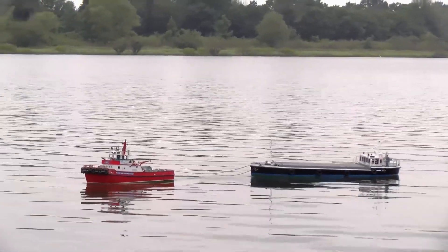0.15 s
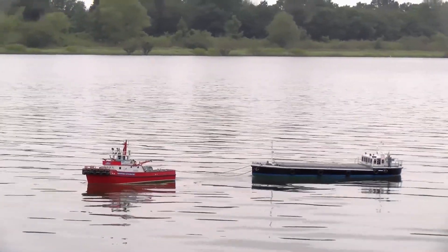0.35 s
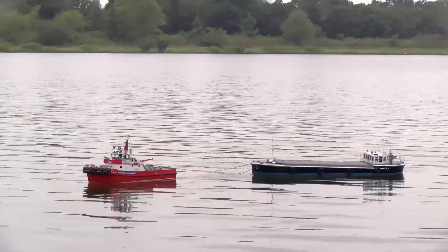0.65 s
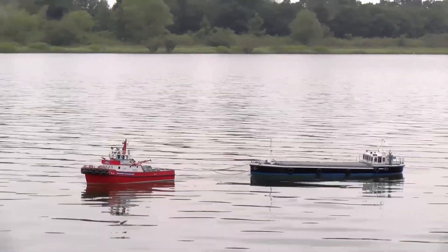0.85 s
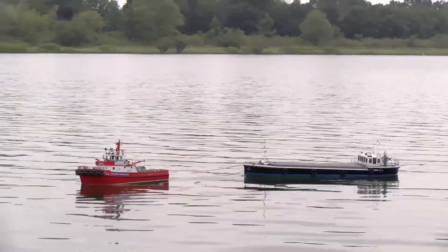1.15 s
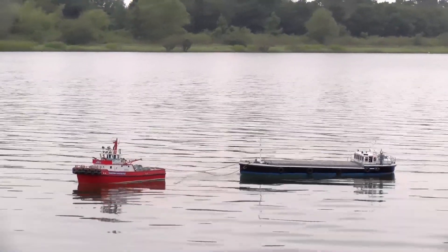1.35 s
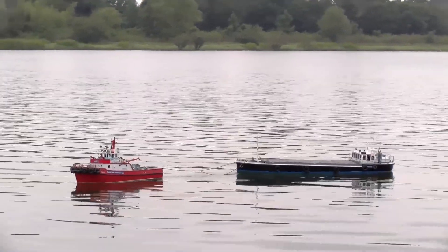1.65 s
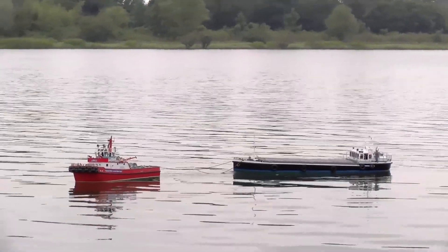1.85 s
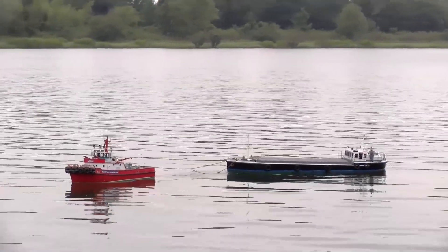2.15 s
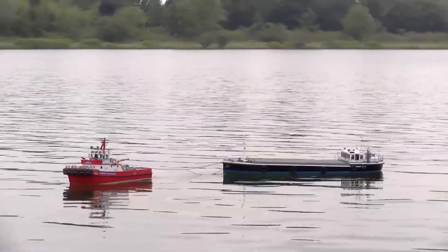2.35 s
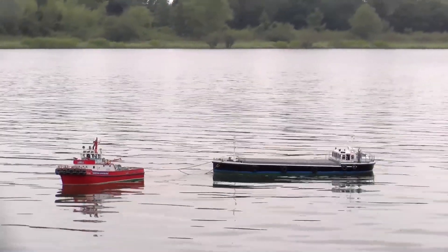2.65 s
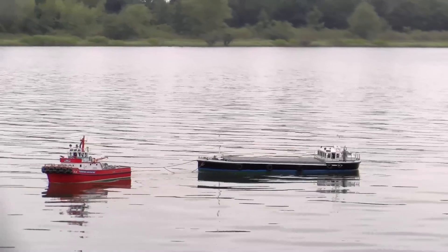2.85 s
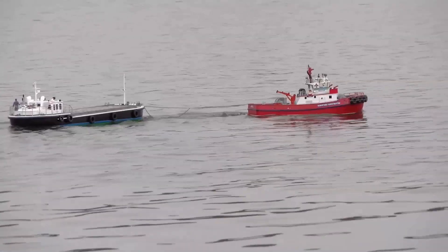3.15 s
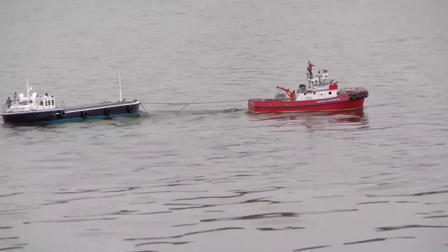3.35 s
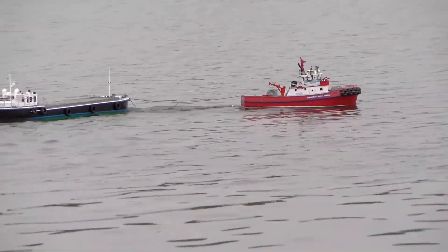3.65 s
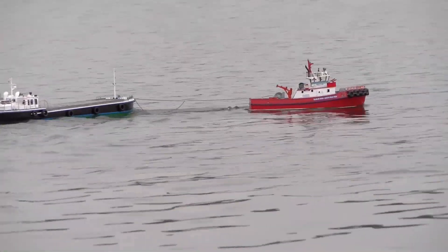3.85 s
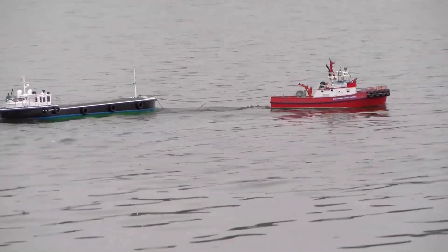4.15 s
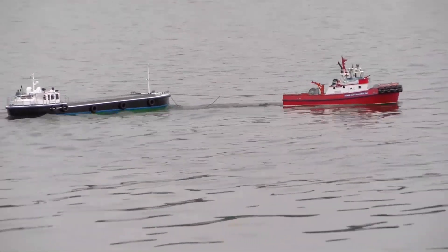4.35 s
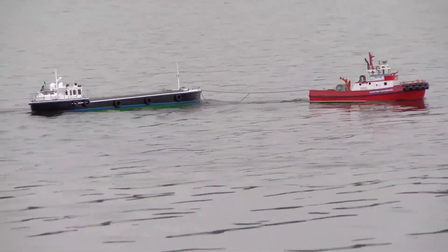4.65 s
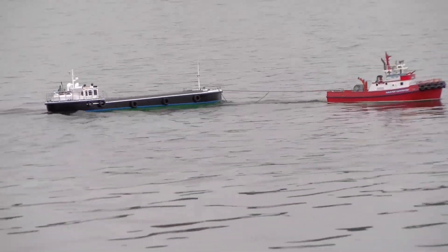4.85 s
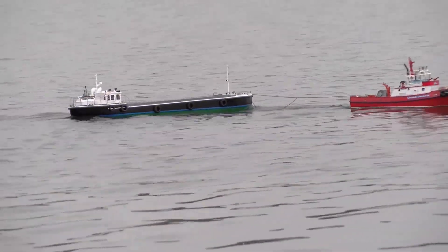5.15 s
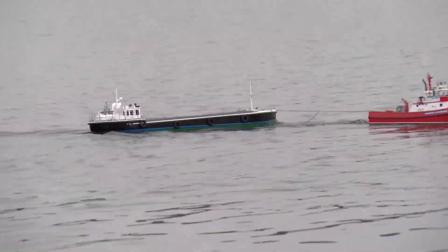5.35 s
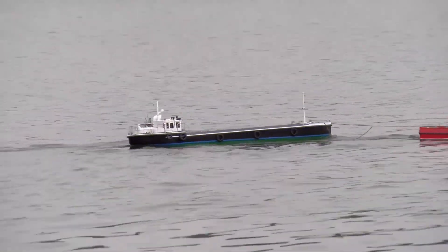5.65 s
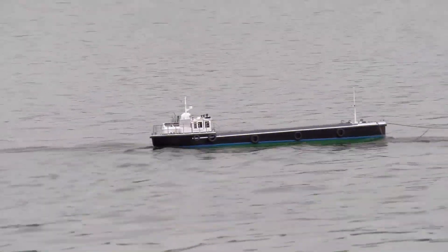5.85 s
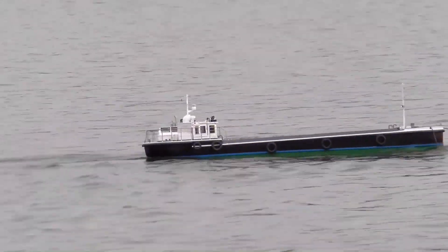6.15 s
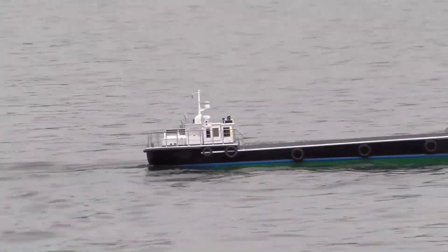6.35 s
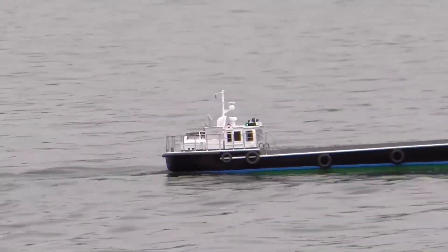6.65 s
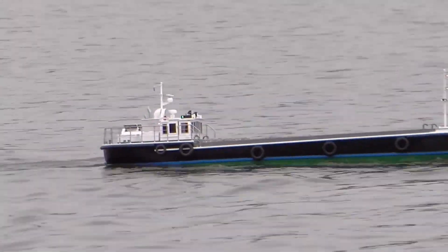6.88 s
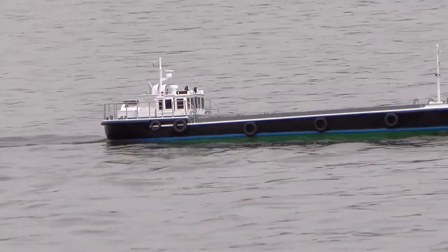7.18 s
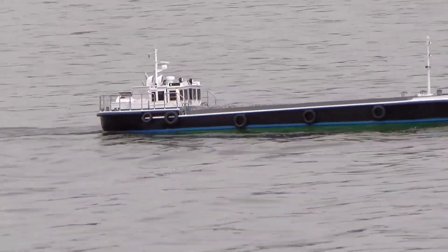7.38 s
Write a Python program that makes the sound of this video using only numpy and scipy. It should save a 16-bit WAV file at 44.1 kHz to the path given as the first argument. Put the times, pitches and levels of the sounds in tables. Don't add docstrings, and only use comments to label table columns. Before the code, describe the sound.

Toy-boat motor whirring loudly with hard hull knocks, cutting to a quieter, lower uneven rattle with ticks, short stalls and a final rise over airy hiss.

```python
import sys
import numpy as np
from scipy import signal
from scipy.fft import rfft, irfft
from scipy.io import wavfile
from scipy.ndimage import uniform_filter1d

SR = 44100
rng = np.random.default_rng(int(sys.argv[2]) if len(sys.argv) > 2 else 0)


def field_ratio(decibels):
    return 10 ** (np.asarray(decibels, dtype=float) / 20)


def store_pcm(level_fs):
    pcm = np.round(np.clip(level_fs, -1, 1) * 32767).astype(np.int16)
    wavfile.write(sys.argv[1], SR, np.atleast_2d(pcm).T)


N = 331632
CUT_S = 3.2066
FAST, SLOW = 0, 1

# multiple_of_shaft_speed, level_db (re hum)
FAST_TONES = [(9.02, -24.5), (12, 1.5), (14.05, -26), (14.99, -25.5), (20.27, -26), (20.67, -24),
              (24.123, -19.5), (29.95, -23.5), (33.54, -24), (36, -15.5), (26.8, -26), (29.4, -36.5),
              (30, -14), (39.4, -33), (41.5, -30), (44.7, -30), (47.3, -44), (52.6, -33.5), (52.6, -23.5),
              (55.37, -22), (43.86, -17.5), (54.22, -16.5), (57.65, -20.5)]
SLOW_TONES = [(12, 2), (15, -5.5), (18, -13.5), (24, -28), (30, -16.5), (36, -7.5), (39, -9.5), (41, -8),
              (54, -21), (57, -9.5), (60, -9.5), (66, -13), (72, -15)]
FAST_POLES_DB = [1, -1.5, -3.5, 0, -5, 4, 1, -3, 8, -4.5, 7.5, -8.5]
SLOW_POLES_DB = [0, -15.5, -1.5, -11, 0.5, -17.5, -0.5, -10, 2, -9, -2, -22]
# start_s, peak_db
FAST_HARD = [(0.1801, -22), (0.2279, -25.5), (0.2504, -28.5), (0.3247, -29), (0.333, -28), (0.4495, -25.5),
             (0.4978, -28), (0.4978, -26), (0.538, -27), (0.5702, -25), (0.5944, -24), (0.7387, -23),
             (0.7888, -27.5), (0.8845, -25), (0.9242, -24.5), (0.9566, -24.5), (1.078, -24.5), (1.102, -26),
             (1.166, -27.5), (1.2217, -27), (1.222, -23), (1.318, -25), (1.358, -26), (1.4138, -30),
             (1.414, -27.5), (1.4621, -27), (1.513, -27.5), (1.562, -28), (1.5877, -22.5), (1.6355, -22),
             (1.6838, -23), (1.7076, -21.5), (1.74, -25), (1.7794, -27), (1.8518, -28), (1.9246, -25),
             (1.9722, -23), (2.0217, -25.5), (2.0297, -26), (2.0698, -28), (2.175, -25), (2.2149, -24.5),
             (2.3046, -26.5), (2.4587, -23), (2.506, -24.5), (2.5287, -29), (2.6026, -35), (2.6026, -26),
             (2.672, -26), (2.7278, -27.5), (2.7764, -23), (2.7841, -26.5), (2.824, -27), (2.848, -25),
             (2.8804, -33), (2.8797, -25.5), (2.9687, -30), (3.065, -25.5), (3.1612, -24.5), (3.1703, -24)]
SLOW_HARD = [(3.435, -27.5), (3.508, -25.5), (3.572, -26), (3.625, -25), (3.667, -24), (3.699, -22),
             (3.826, -27), (3.858, -25.5), (3.889, -24.5), (3.953, -25), (4.079, -24), (4.13, -26),
             (4.332, -25.5), (4.395, -28), (4.457, -24), (4.646, -21), (4.709, -24), (4.825, -32),
             (4.926, -26), (5.0, -26), (5.064, -25), (5.158, -24.5), (5.19, -24.5), (5.317, -26.5),
             (5.349, -28), (5.38, -24.5), (5.443, -23), (5.506, -26), (5.559, -27), (5.57, -26),
             (5.581, -24), (5.602, -26), (5.771, -23.5), (5.822, -24.5), (5.886, -26), (5.938, -26),
             (5.948, -25), (6.011, -23), (6.074, -25), (6.137, -22.5), (6.19, -31), (6.199, -23.5),
             (6.325, -27), (6.372, -23), (6.414, -31), (6.456, -24), (6.55, -14), (6.561, -24),
             (6.645, -25), (6.677, -26), (6.688, -23.5), (6.801, -22.5), (6.864, -24), (6.927, -28),
             (6.927, -24.5), (7.053, -26), (7.064, -22), (7.356, -24.5), (7.403, -26), (7.469, -27)]
# time_s, hum_pitch_hz (12 x shaft)
HUNTING = [(0.0, 241.93), (0.08, 249.8), (0.2, 249.65), (0.45, 248.05), (0.65, 248.04), (0.85, 248.37),
           (1.1, 248.84), (1.3, 250.25), (1.45, 249.16), (1.55, 247.92), (1.8, 250.1), (1.95, 247.67),
           (2.1, 247.26), (2.3, 246.85), (2.55, 248.56), (2.75, 248.6), (2.95, 248.63), (3.2, 250.94)]
# time_s, lead_cycles (of the hum)
SLOW_LEAD = [(3.15, -.25), (3.4, -.68), (3.8, -.9), (4.0, -1.15), (4.1, -1.07), (4.28, -1.42), (4.6, -.68),
             (4.8, -.78), (5.1, -1.18), (5.3, -1.32), (5.4, -1.2), (5.72, -1.53), (6.05, -1.04),
             (6.15, -1.1), (6.3, -.75), (6.75, -.55), (6.88, -.2), (7.16, -.24)]
SLIPS_S = [.4, 1.52, 2.65, 4.87, 6.35]
# start_s, length_s, hum_db, rattle_db
STALLS = [
    (3.292, 0.033, -7, -3),
    (4.508, 0.11, -10.5, -16),
    (6.459, .094, -14.5, -27),
]
# centre_hz, width_hz, fast_early_db, fast_late_db, slow_early_db, slow_late_db
HOUSING = [(261.4, 107, 10.5, 8.5, 7, 8), (475, 24, 6, 14, 2.5, -1.5), (667, 140, 4.5, 5, 6.5, 16),
           (708.5, 41.6, -15.5, -12.5, -12.5, -40), (878, 140, 5.5, 7.5, 9, 8),
           (1008, 27, -0.5, 4, -20, -4.5), (1164, 360, 7.5, 6.5, 9, 12.5), (1890, 430, 4, 5.5, 5.5, 7),
           (2430, 200, 4.5, 9, 8, 4), (2757, 69, 10, 10.5, -27, -1.5), (3450, 460, 12, 11, 0.5, 12),
           (3786, 150, 16, 8, 8, 13.5), (4020, 480, -9, 2, 0, -19.5), (4740, 690, 7, 3.5, 5, 9),
           (5420, 300, 4.5, 4.5, 2, 10), (7086, 980, 8, 13, 14, 12.5), (8036, 200, 10.5, 11, 2, 2),
           (8810, 810, 13, 10.5, 14.5, 13.5), (9830, 410, 7, 7.5, 12, 0)]
# centre_hz, width_hz, early_db, late_db, last_db
SHADES = [(480, 100, -8.5, 4, -1.5), (754, 60, 1.5, 0.5, -6), (1150, 180, 0, 0, 1), (2070, 70, -6, 4.5, 6),
          (2350, 180, 4.5, -3, 6.5), (2520, 120, 3.5, -7, -4), (2800, 35, 2, 10.5, 13),
          (2884, 74, 4, -12, -11), (3036, 87, 12, 7, -7), (3110, 170, -8.5, 6.5, 6.5),
          (3390, 160, 9.5, 0.5, 1), (3600, 120, -6, -3, -17), (3866, 100, 3, 4.5, 12),
          (4070, 120, 0, -13, -9), (5630, 200, -5, 5, 5), (6000, 320, -6, -12, 6.5), (6400, 300, 1, 3, 6),
          (7000, 370, -0.5, -2.5, 0.5), (7360, 200, -7, -3, -1), (8060, 240, 1, -1, 5),
          (8580, 200, 4, -8, 7), (9230, 440, 3, 7, 7.5)]
# pitch_hz, level_db (per Hz)
FAST_SLOPE = [(60, -75), (100, -69.5), (190, -25.5), (250, -13), (350, -34.5), (620, -9), (1150, -21.5),
              (1500, -25), (3000, -37.5), (6000, -43.5), (9000, -50), (10500, -48), (12000, -71),
              (15000, -82.5)]
SLOW_SLOPE = [(59, -51), (100, -44.5), (134, -15.5), (186, -3), (305, -5), (568, -10), (728, -11.5),
              (933, -6), (2520, -29.5), (3890, -31), (14000, -61)]
# from_s, to_s
TURNING = [
    (1.7, 2.6),
    (4.3, 5),
]
# pitch_hz, side_re_mid_db
LEAN = [(300, -58), (600, -34.5), (900, -17.5), (1200, -13.5), (1800, -14.5), (2700, -20), (4200, -19),
        (6500, -17.5), (12000, -20.5)]
# start_s, peak_db, ring_hz
TICKS = [(3.2809, -38.5, 3520), (3.3463, -38.5, 3500), (3.4466, -36.5, 3500), (3.5833, -37, 3480),
         (3.6257, -37, 3500), (3.7, -37.5, 3860), (3.7943, -40, 3340), (3.8367, -36, 3030),
         (3.8891, -40, 3890), (4.0063, -35, 3880), (4.0906, -40, 3820), (4.2712, -39, 3010),
         (4.3331, -42, 2940), (4.3954, -42, 3780), (4.4473, -47, 3510), (4.5014, -47, 5080),
         (4.572, -42, 3620), (4.6563, -39, 3620), (4.6992, -42, 5560), (4.7092, -46, 2800),
         (4.7092, -46, 3520), (4.7825, -43, 3890), (4.8354, -42, 3750), (4.8843, -39, 3700),
         (4.9157, -43, 3080), (5.0744, -38, 3210), (5.1918, -39, 3110), (5.3068, -39, 3100),
         (5.3268, -38, 3040), (5.3587, -39, 3380), (5.5064, -36, 3390), (5.6116, -37, 3600),
         (5.6341, -39, 3290), (5.6984, -39, 3260), (5.7617, -40, 3150), (5.8232, -35, 3160),
         (6.0107, -43, 3110), (6.0202, -40, 3580), (6.1472, -33, 3210), (6.19, -48, 3330),
         (6.1887, -40, 5700), (6.2098, -41, 3450), (6.2617, -40, 3440), (6.2714, -42, 5420),
         (6.324, -38, 3420), (6.3344, -41, 3350), (6.3732, -43, 3070), (6.4033, -40, 3270),
         (6.4243, -40, 3380), (6.4453, -41, 3280), (6.561, -38, 3280), (6.6129, -39, 5490),
         (6.6233, -38, 3380), (6.6453, -46, 3360), (6.688, -41, 5530), (6.8114, -39, 3300),
         (6.863, -39, 3290), (6.9481, -42, 3720), (6.981, -40, 3310), (6.99, -34, 3360)]
# ring_hz, level_db
TICK_RINGS = [(3350, -12.5), (5500, -8.5), (7050, -10)]
# ring_hz, level_db
THUD_RINGS = [(1135, 2), (887, 2.5), (1890, -13)]
# centre_s, level_db, pitch_hz, half_length_s, spread_hz
CHIRPS = [
    (2.122, -60, 11400, .012, 1410),
    (2.14, -68, 11500, .02, 150),
    (2.598, -64, 11500, .016, 200),
    (2.698, -76, 11750, .02, 30),
    (2.793, -64, 11500, .018, 200),
    (4.49, -52, 3600, .006, 150),
    (4.537, -55, 3750, .012, 150),
    (4.598, -56, 3800, .01, 150),
    (4.668, -56, 3600, .008, 150),
]
# pitch_hz, level_db (per Hz)
AIR = [(40, -37.5), (100, -14), (250, -4.5), (500, 3), (900, -4), (1300, -6.5), (2000, -20.5), (2800, -28),
       (3700, -22.5), (5000, -23), (7000, -35), (10000, -36.5), (15500, -49.5)]
# centre_s, above_breeze_db, half_length_s
GUSTS = [
    (0.033, 21, 0.15),
    (0.784, 15, 0.054),
    (1.55, 10, 0.046),
    (3.04, 11, 0.044),
    (5.702, 18, 0.1),
    (7.04, 9, 0.099),
    (7.2, 10, 0.066),
]
# centre_s, level_db, pitch_hz, half_length_s
THUMPS = [
    (5.627, -42.5, 94.5, 0.032),
    (5.69, -37, 80, .01),
    (5.7068, -34, 190, 0.0052),
    (5.716, -29, 89.5, 0.023),
]
# pitch_hz, threshold_db (re loudness)
MASK = [(300, -92.5), (3000, -86), (5000, -61), (6500, -49.5), (9000, -51), (11000, -54), (16000, -60)]
# pitch_hz, threshold_db
SIDE_MASK = [(100, 36), (600, 29), (3000, -23), (5000, -4), (7000, -10.5)]
# start_s, depth (0-1), recovery_s, pop_db, pop_length_s
SNAPS = [
    (0.0403, 0.92, 0.0073, -19, 0.00022),
    (0.047, 0, .002, -31, 0.00035),
    (5.475, 0.01, .002, -35, .0002),
    (2.1165, 0.89, 0.0095, -30, 0.0023),
    (5.498, 1, 0.0065, -24, 0.00018),
    (6.916, 0.5, 0.0022, -35, 0.00029),
]
POPS = [
    (0.539, 0.21, 0.003, -26, 0.0016),
    (3.539, 0.39, 0.022, -43, .003),
    (5.539, 0.96, 0.008, -45, 0.0029),
]

FAST_HUM_DB, FAST_RATTLE_DB = -23.5, -31
SLOW_HZ, SLOW_HUM_DB, SLOW_RATTLE_DB = 190, -42.5, -37
FIRST_CYCLE, KNOCK_LAG = (0, 10.5), (.65, .25)
SLIP_KNOCKS = 5
KNOCK_SWELL_DB = .9
KNOCK_SKIRT_DB = (-14, -11)
HARD_GAIN_DB = (34, 29.5)
HARD_SCRAPE_DB, HARD_LAG_S = -6, .0004
BRUSH_DB = (-2, -2.5)
STALL_WHIRR, WHIRR_HZ = .3, 2600
LAST_TURN_S = (5.95, 7)
RUN_UP_S, RUN_UP_DB, RUN_UP_RATTLE_DB = 0.19, 21, 1
STALL_FALL_S, STALL_CATCH_S, CATCH_KICK_DB, KICK_S = 0.0069, 0.0067, -1, 0.037
SPEED_UP_S, SPEED_UP_RISE_S, SPEED_UP_HZ, SPEED_UP_DB = 7.16, 0.16, 20, 4.5
SURGE_DB, SURGE_RISE_S = -2.5, .06
THUD_DB, THUD_T60_S, THUD_RISE_S = -4.5, 0.0222, 0.00086
TICK_DB, TICK_T60_S, TICK_RISE_S = -6.5, 0.018, 0.00076
AIR_DB = -41.5
WIND_DB, WIND_LUMPS_DB, WIND_LUMPS_HZ = (-69, -59.5), -0.5, 21
CEILING, SELF_NOISE_DB = 0.36, -74
SWAY_DB, SWAY_HZ = 1.2, 25.3
LAST_MASK_S, LAST_MASK_RISE_S, LAST_MASK_DB = 7.23, 0.052, 6
BAND_KEEP_DB = -3
SNAP_RISE_PER_S, POP_RISE_S = 36, .0011


def evened(x):
    return x / np.sqrt(np.mean(x ** 2) + 1e-20)


def read(points, hz):
    f, value = np.transpose(points)
    return np.interp(np.log(hz + 1), np.log(f + 1), value)


def peaks(table, hz):
    f, width, *levels_db = np.transpose(table)
    shapes = 1 / (1 + (2 * (hz[:, None] - f) / width) ** 2)
    return [shapes @ db for db in levels_db]


def colour(x, db):
    log_gain = np.log(field_ratio(np.maximum(db, -100)))
    circle = np.concatenate([log_gain, log_gain[-2:0:-1]])
    taps = np.fft.ifft(np.exp(np.conj(signal.hilbert(circle)))).real
    return signal.oaconvolve(x, taps[:2000])[:len(x)]


def swell_and_die(x, fall):
    return signal.lfilter([1], [1, -2 * fall, fall ** 2], x)


def drift(hz, t):
    walk = swell_and_die(rng.standard_normal(9000), np.exp(-hz / 1000))[1000:]
    return np.interp(t, np.arange(8000) / 1000, evened(walk))


def ramp(t, start, length):
    return np.clip((t - start) / length, 0, 1)


def motor(run, effort, tones, poles_db, slope, hard, spread_db, click_db, burst_db, burst_s,
          knock_hz, knock_octaves, waver_db):
    start, stop = [(0, int(3.3 * SR)), (int(3.15 * SR), N)][run]
    t = np.arange(start, stop) / SR
    pitch_hz, hum_db, rattle_db = effort(t)
    turns = (FIRST_CYCLE[run] + np.cumsum(pitch_hz) / SR) / 12
    clicks, scrapes = knock_trains(run, t, turns, poles_db, spread_db, hard)
    burst = swell_and_die(scrapes, np.exp(-1 / (burst_s * SR))) * rng.standard_normal(len(t))
    blow = field_ratio(burst_db) * evened(burst) + field_ratio(click_db) * evened(clicks)
    octaves = np.log2((np.fft.rfftfreq(4096, 1 / SR) + 1) / knock_hz)
    blow = colour(blow, KNOCK_SKIRT_DB[run] * np.log10(1 + (octaves / knock_octaves) ** 2))
    grind, whirr = brushes(run, t)
    usual_db = np.median(rattle_db)
    dip_db = rattle_db - usual_db
    drive = (grind + blow) * field_ratio(dip_db) + whirr * field_ratio(STALL_WHIRR * dip_db)
    rattle = field_ratio(usual_db) * housing(run, t, slope, drive)
    shaft = np.sqrt(2) * field_ratio(hum_db) * hum(t, turns, tones, waver_db)
    return np.pad(shaft + rattle, (start, N - stop))


def hum(t, turns, tones, waver_db):
    surge = field_ratio(SURGE_DB) * ramp(t, SPEED_UP_S, SURGE_RISE_S)
    out = -surge * np.sin(2 * np.pi * 36 * turns)
    for multiple, db in tones:
        overtone = round(multiple / 12)
        if abs(multiple - 12 * overtone) < .2:
            level = field_ratio(db + .35 * overtone ** 1.4 * drift(60, t))
            cycles = 12 * overtone * turns + (overtone - 1) / 4
        else:
            level = field_ratio(db + 0.96 * waver_db * drift(70, t))
            cycles = multiple * turns + rng.random() + 0.069 * drift(40, t)
        yields = overtone != 1 or multiple > 12.2
        out += (1 - surge * yields) * level * np.sin(2 * np.pi * cycles)
    return out


def knock_trains(run, t, turns, poles_db, spread_db, hard):
    slot = np.floor(12 * turns - KNOCK_LAG[run]).astype(int)
    step = np.flatnonzero(np.diff(slot)) + 1
    slips = np.searchsorted(SLIPS_S, t[step]) - np.searchsorted(SLIPS_S, t[0])
    count = slot[step] + SLIP_KNOCKS * slips
    luck = rng.uniform(-1, 1, (N // 150, 2))[:len(step)]
    size_db = np.take(poles_db, count % len(poles_db)) + spread_db * luck[:, 0]
    size_db += KNOCK_SWELL_DB * drift(35, t[step])
    at = step + (16.0 * luck[:, 1]).astype(int)
    hard_s, hard_db = np.transpose(hard)
    nearest = abs(t[step] - hard_s[:, None]).argmin(axis=1)
    size_db[nearest] = hard_db + HARD_GAIN_DB[run]
    at[nearest] = (hard_s + HARD_LAG_S) * SR - int(round(t[0] * SR))
    at = np.clip(at, 0, len(t) - 1)
    clicks, scrapes = np.zeros((2, len(t)))
    clicks[at] = field_ratio(size_db)
    size_db[nearest] += HARD_SCRAPE_DB
    scrapes[at] = field_ratio(size_db)
    return clicks, scrapes


def brushes(run, t):
    noise = rng.standard_normal(len(t)) * field_ratio(BRUSH_DB[run] + 1.9 * drift(250, t))
    high = signal.butter(2, WHIRR_HZ, "high", fs=SR, output="sos")
    whirr = signal.sosfiltfilt(high, noise)
    return noise - whirr, whirr


def housing(run, t, slope, drive):
    hz = np.fft.rfftfreq(4096, 1 / SR)
    views = [read(slope, hz) + db for db in peaks(HOUSING, hz)[2 * run:2 * run + 2]]
    if run == SLOW:
        views = [view + db for view, db in zip(views + views[1:], peaks(SHADES, hz))]
    early, late, *last = (evened(colour(drive, view)) for view in views)
    if run == SLOW:
        late = late + np.interp(t, LAST_TURN_S, [0, 1]) * (last[0] - late)
    swing = np.interp(t, TURNING[run], [0, 1])
    return (1 - swing) * early + swing * late


def fast_run(t):
    return np.interp(t, *np.transpose(HUNTING)), FAST_HUM_DB, FAST_RATTLE_DB


def slow_run(t):
    up = ramp(t, SPEED_UP_S, SPEED_UP_RISE_S)
    lead = uniform_filter1d(np.interp(t, *np.transpose(SLOW_LEAD)), size=2000)
    pitch_hz = SLOW_HZ + SR * np.gradient(lead) + SPEED_UP_HZ * up
    hum_db, rattle_db = SLOW_HUM_DB + SPEED_UP_DB * up, SLOW_RATTLE_DB
    for start, length, hum_dip_db, rattle_dip_db in STALLS:
        caught = ramp(t, start + length, STALL_CATCH_S)
        strain = length * (ramp(t, start - RUN_UP_S, RUN_UP_S) - caught)
        dip = ramp(t, start, STALL_FALL_S) - caught
        kick_db = CATCH_KICK_DB * caught * (1 - ramp(t, start + length, KICK_S))
        hum_db = hum_db + RUN_UP_DB * strain + hum_dip_db * dip
        rattle_db = rattle_db + rattle_dip_db * dip + kick_db + RUN_UP_RATTLE_DB * strain
    return pitch_hz, hum_db, rattle_db


def thuds():
    train, t = np.zeros(N), np.arange(1500) / SR
    s, peak_db = np.transpose(SLOW_HARD)
    train[(s * SR).astype(int)] = field_ratio(peak_db + THUD_DB)
    rattle_db = slow_run(np.arange(N) / SR)[2]
    train *= field_ratio(np.minimum(rattle_db - SLOW_RATTLE_DB, 0))
    shape = (1 - np.exp(-t / THUD_RISE_S)) * field_ratio(-60 * t / THUD_T60_S)
    ring = shape * sum(field_ratio(db) * np.sin(2 * np.pi * f * t) for f, db in THUD_RINGS)
    return signal.oaconvolve(train, -ring / abs(ring).max())[:N]


def ticks():
    out, t = np.zeros(N), np.arange(1500) / SR
    shape = (1 - np.exp(-t / TICK_RISE_S)) * field_ratio(-60 * t / TICK_T60_S)
    shape /= shape.max()
    for s, peak_db, ring_hz in TICKS:
        modes = [(ring_hz, 0)] + list(TICK_RINGS)
        ring = sum(field_ratio(db) * np.sin(2 * np.pi * (f * t + rng.random())) for f, db in modes)
        out[int(s * SR):][:len(t)] += field_ratio(peak_db + TICK_DB) * shape * ring
    return out


def chirps():
    out, t = np.zeros(N), np.arange(-3000, 3000) / SR
    for s, db, pitch_hz, half, spread_hz in CHIRPS:
        luck = rng.uniform(-1, 1, (2, 5, 1))
        pitches = pitch_hz + spread_hz * luck[0]
        bunch = np.sin(2 * np.pi * pitches * t + np.pi * luck[1]).sum(0) / 2
        out[int(s * SR) - len(t) // 2:][:len(t)] += field_ratio(db) * np.exp(-(t / half) ** 2) * bunch
    return out


def open_air():
    frames, hz = N // 256 + 5, np.fft.rfftfreq(1024, 1 / SR)
    a, b, c, d, patches = rng.standard_normal((frames, 513, 5)).T
    patches = evened(uniform_filter1d(uniform_filter1d(patches, 12, 0), 10, 1))
    apart_db = np.interp(hz, [500, 5000, 8000, 12000], [-40.0, -18.5, -8.5, -9.0])
    apart = field_ratio(apart_db)[:, None] * (c + 1j * d)
    z = np.array([a + 1j * b + apart, a + 1j * b - apart])
    z = z * field_ratio(read(AIR, hz)[:, None] + 1.8 * patches)
    return field_ratio(AIR_DB) * evened(signal.istft(z, nperseg=1024, noverlap=768)[1][:, :N])


def wind():
    t = np.arange(N) / SR
    band = signal.butter(3, [65, 115], "band", fs=SR, output="sos")
    rumble = signal.sosfilt(band, rng.standard_normal(N))
    gusts_db = sum(db * np.exp(-((t - s) / half) ** 2) for s, db, half in GUSTS)
    level_db = np.where(t < CUT_S, *WIND_DB) + gusts_db + WIND_LUMPS_DB * drift(WIND_LUMPS_HZ, t)
    out = field_ratio(level_db) * evened(rumble)
    for s, db, pitch_hz, half in THUMPS:
        out += field_ratio(db) * np.exp(-((t - s) / half) ** 2) * np.sin(2 * np.pi * pitch_hz * (t - s))
    return out


def scene():
    fast = motor(FAST, fast_run, FAST_TONES, FAST_POLES_DB, FAST_SLOPE, FAST_HARD, spread_db=1.4,
                 click_db=0.96, burst_db=0.68, burst_s=0.00082, knock_hz=1780, knock_octaves=0.51, waver_db=2.6)
    slow = motor(SLOW, slow_run, SLOW_TONES, SLOW_POLES_DB, SLOW_SLOPE, SLOW_HARD, spread_db=1.8,
                 click_db=0.0, burst_db=0.0, burst_s=0.00096, knock_hz=5200, knock_octaves=1.7, waver_db=3.3)
    t = np.arange(N) / SR
    side = irfft(rfft(fast) * field_ratio(read(LEAN, np.fft.rfftfreq(N, 1 / SR))), N)
    side *= 1 + 0.78 * drift(900, t)
    change = ramp(t, CUT_S, .0012)
    motors = (1 - change) * np.array([fast - side, fast + side]) + change * slow
    return motors + open_air() + wind() + ticks() + thuds()


def masked(x):
    hz, frame_s, z = signal.stft([x[0] + x[1], x[0] - x[1]], SR, "cosine", nperseg=2048, noverlap=1024)
    loudness = np.sqrt((abs(z[0]) ** 2).sum(0)) ** 1.274
    wander = np.repeat(rng.standard_normal((z.shape[2], 65, 2)).T, 16, axis=1)[:, :1025]
    threshold_db = wander * [[[3.0]], [[6.0]]] + [[[0.0]], [[-3.0]]]
    threshold_db += SWAY_DB * drift(SWAY_HZ, frame_s)
    threshold_db += LAST_MASK_DB * ramp(frame_s, LAST_MASK_S, LAST_MASK_RISE_S)
    threshold_db[1] += read(SIDE_MASK, hz)[:, None]
    threshold = field_ratio(read(MASK, hz)[:, None] + threshold_db) * loudness
    power = (abs(z[:, :1024]) ** 2).reshape(2, 64, 16, -1).mean(2)
    band = np.sqrt(power).repeat(16, axis=1)
    z[:, :1024] *= band > field_ratio(BAND_KEEP_DB) * threshold[:, :1024]
    z *= abs(z) > threshold
    mid, side = signal.istft(z, SR, "cosine", nperseg=2048, noverlap=1024)[1][:, :N] / 2
    return np.array([mid + side, mid - side])


def drop_out(x, event, rise_s):
    s, depth, recovery_s, pop_db, length = event
    near = slice(int(s * SR), int(s * SR) + SR // 10)
    after = np.maximum((np.arange(N) / SR)[near] - s, 0)
    mute = np.sin(np.pi / 2 * ramp(after, 0, 0.0003)) ** 2 * np.exp(-(after / recovery_s) ** 2)
    pop = np.sin(np.pi / 2 * ramp(after, 0, rise_s)) ** 2 * np.exp(-after / length)
    x[:, near] *= 1 - depth * mute
    x[:, near] += field_ratio(pop_db) * pop


def top_cut(x):
    return signal.sosfilt(signal.butter(12, 15810, fs=SR, output="sos"), x)


def record(dry):
    limited = CEILING * np.tanh(dry / CEILING)
    mix = masked(limited + field_ratio(SELF_NOISE_DB) * rng.standard_normal(N))
    mix = mix + chirps()
    for snap in SNAPS:
        drop_out(mix, snap, SNAP_RISE_PER_S * snap[-1] ** 2)
    for pop in POPS:
        drop_out(mix, pop, POP_RISE_S)
    return top_cut(mix)


dry = scene()
out = record(dry)
store_pcm(out)
```